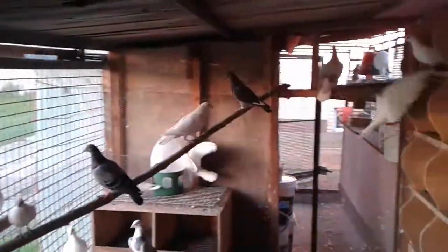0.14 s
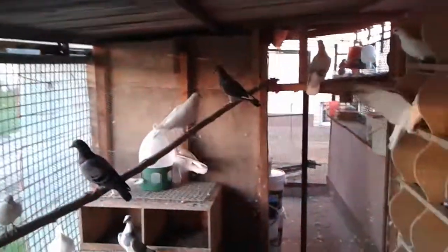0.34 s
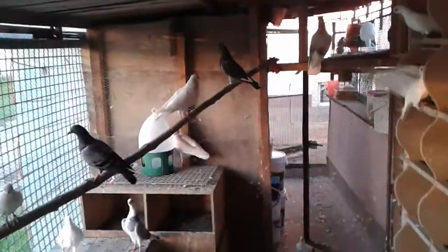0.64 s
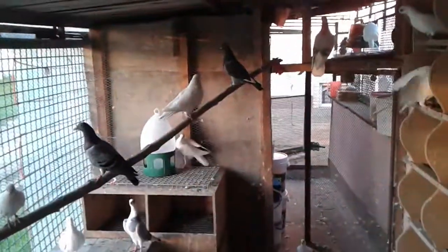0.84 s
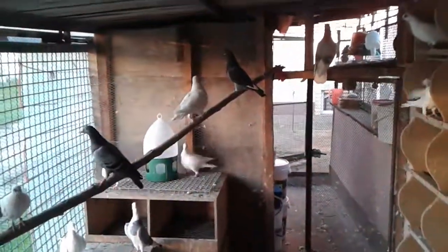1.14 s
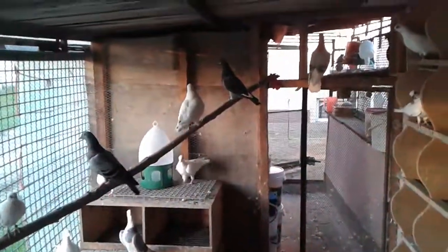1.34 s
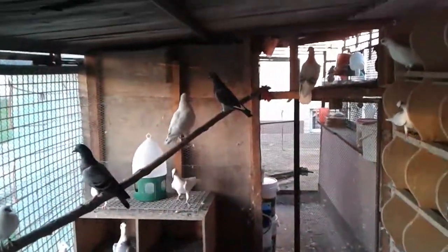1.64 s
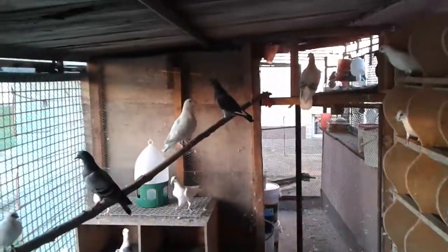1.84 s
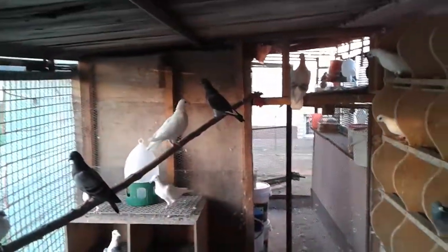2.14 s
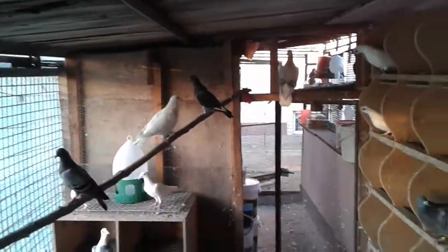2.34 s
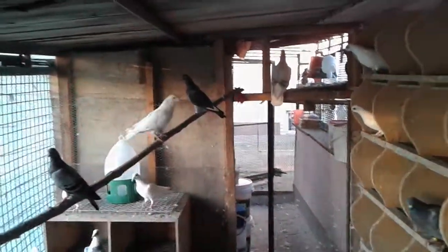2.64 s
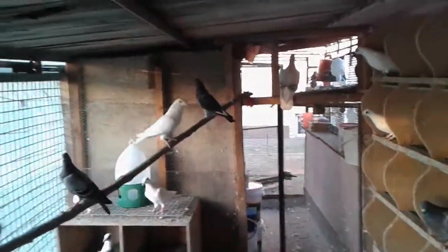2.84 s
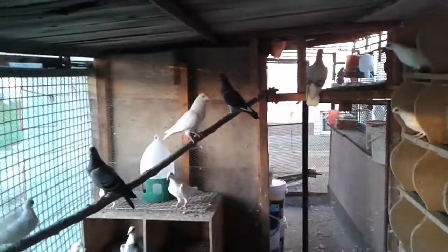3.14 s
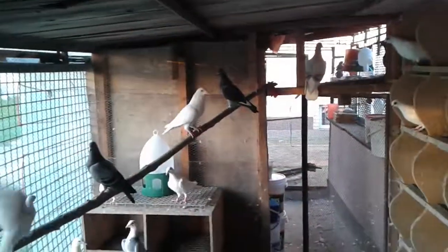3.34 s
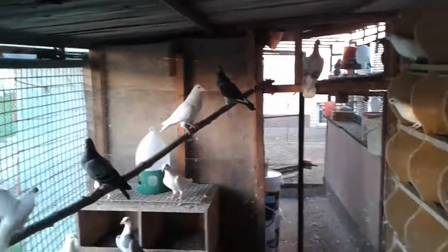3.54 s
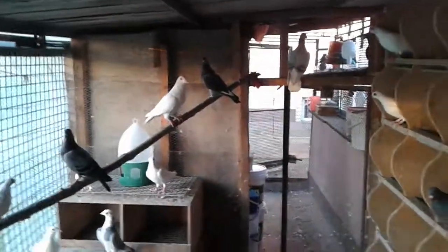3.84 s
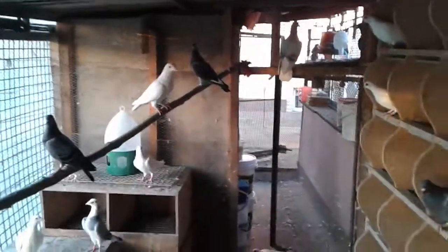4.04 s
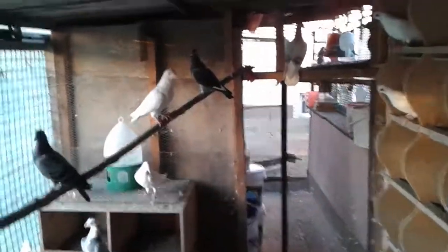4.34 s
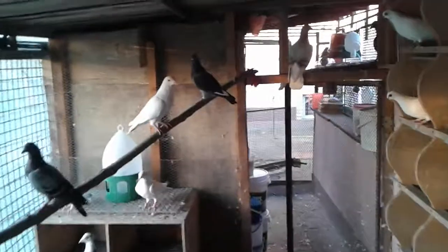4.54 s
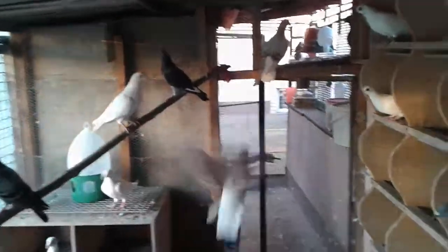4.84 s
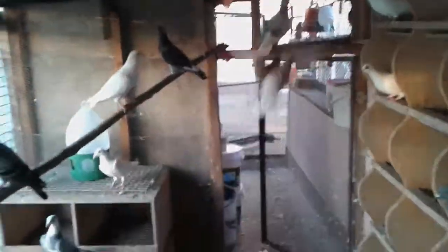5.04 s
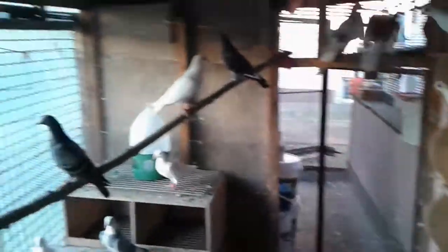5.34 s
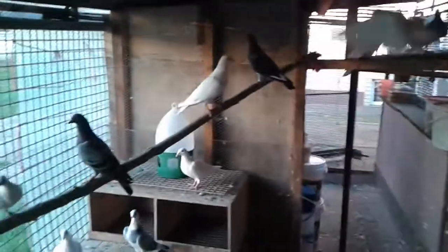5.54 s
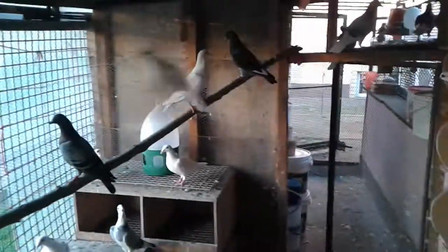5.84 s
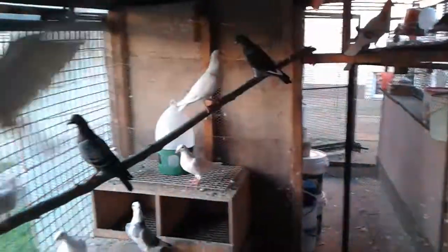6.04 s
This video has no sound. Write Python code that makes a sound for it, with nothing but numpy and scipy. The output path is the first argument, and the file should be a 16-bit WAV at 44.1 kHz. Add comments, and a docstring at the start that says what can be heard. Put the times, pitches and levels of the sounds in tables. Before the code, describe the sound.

Low stuttering pigeon coos with dry scratches and dull thuds, a small hard squeak and snap nearby, then bursts of flapping and scuffling.

```python
"""A wooden pigeon loft: one bird coos a stutter of short notes and then a held note, three times.
The coos are gliding partials; scratches, feather flicks and longer scrapes are bursts of grainy noise.
Low thuds ring at a pitch, a wing bone knocks a nest box, wings and shuffling birds are shaped noise.
Close to the microphone something small and hard squeaks by stick and slip, and snaps as ringing modes.
Short wooden echoes and a faint, uneven low murmur lie behind."""
import sys
import numpy as np
from scipy import signal
from scipy.fft import rfft, irfft
from scipy.io import wavfile
from scipy.ndimage import uniform_filter1d

SR = 44100
rng = np.random.default_rng(int(sys.argv[2]) if len(sys.argv) > 2 else 0)


def put_to_file(sound):
    """Save the sound as 16-bit audio at rate SR, in the file named by the first command-line argument."""
    columns = np.atleast_2d(sound).T  # one column per channel
    safe = np.clip(columns, -1, 1)
    whole_steps = np.round(safe * 32767)
    wavfile.write(sys.argv[1], SR, whole_steps.astype(np.int16))


N = 272097


def gain_of(db):
    """Decibels to amplitude."""
    return 10 ** (np.asarray(db) / 20)


def evened(x):
    """Scales to rms 1."""
    return x / np.sqrt(np.mean(x ** 2) + 1e-20)


def read(points, hz):
    """Reads a table against frequency on a log-frequency axis."""
    f, value = np.transpose(points)
    return np.interp(np.log(hz + 1), np.log(f + 1), value)


def add(mix, s, sound):
    """Mixes a sound in at time s."""
    part = mix[max(round(s * SR), 0):][:len(sound)]
    part += sound[:len(part)]


def play(mix, rows, source):
    """Mixes in one sound of the source for each row of its table."""
    for row in rows:
        add(mix, *source(*row))


def columns(rows):
    """Sample times and every column of a curve table."""
    s, *rest = np.transpose(rows)
    t = np.arange(s[0], s[-1], 1 / SR)
    return t, *(np.interp(t, s, c) for c in rest)


def wander(size, smooth_s):
    """Smooth chance of rms 1."""
    span = max(int(smooth_s * SR), 1)
    return evened(uniform_filter1d(uniform_filter1d(rng.standard_normal(size), span), span))


def grainy(size, hz, octaves, grain_db, skirt):
    """Uneven noise around one pitch, with a weak skirt towards the treble."""
    f = np.fft.rfftfreq(size, 1 / SR) + 1
    colour = np.exp(-.5 * (np.log2(f / hz) / octaves) ** 2) + skirt * f / (f + hz)
    hump = evened(irfft(rfft(rng.standard_normal(size)) * colour))
    return hump * gain_of(grain_db * wander(size, 0.00052))


def noise(spectrum, patchy_db, flicker_db):
    """Coloured noise with drifting patches and a flicker shared by all frequencies."""
    frames, hz_bins = N // 128 + 5, 257
    patches = uniform_filter1d(rng.standard_normal((hz_bins, frames)), 6, axis=0)
    patches = evened(uniform_filter1d(patches, 12, axis=1))
    flicker = evened(uniform_filter1d(rng.standard_normal(frames), 3))
    field = gain_of(patchy_db * patches + flicker_db * flicker)
    white = rfft(rng.standard_normal(N))
    coloured = irfft(white * gain_of(read(spectrum, np.fft.rfftfreq(N, 1 / SR))), N)
    z = signal.stft(coloured, nperseg=512, noverlap=384)[2]
    return evened(signal.istft(z * field[:, :z.shape[1]], nperseg=512, noverlap=384)[1][:N])


# short low notes of the stutter, and at 5.385 and 5.702 s soft wing thumps: t/s, level/dB,
# pitch about a third of the way in f/Hz, octave against the note level/dB, length t/s
SHORT_LOW_NOTES = [(0.261, -42, 290, -7, 0.028), (0.311, -34, 333, -11, 0.018),
                   (0.358, -38, 322, -8, 0.029), (0.422, -36, 301, -9.5, 0.029),
                   (1.24, -39, 285, -11, 0.03), (1.299, -39.5, 324, -4, 0.028),
                   (1.369, -40, 323, -4.5, 0.025), (2.905, -48, 355, -16.5, 0.018),
                   (2.936, -47, 267, -7, 0.034), (2.977, -39, 278, -8, 0.031),
                   (3.024, -35, 319, -13, 0.036), (3.104, -40, 278, -5.5, 0.0246),
                   (3.585, -49.5, 214, -15.5, 0.036), (3.63, -51.5, 201, -18.5, 0.023),
                   (5.385, -45, 318.5, -21, 0.033), (5.702, -31.5, 302.5, -27, 0.032)]
RASP_DB = -23.5  # third and fourth partials


def note(s, db, hz, octave_db, length):
    """A short low note: the pitch sags, the octave swells in the middle as the crop resonates."""
    u = np.arange(0, 1, 1 / (length * SR))
    turn = 2 * np.pi * np.cumsum(hz * (1.08 - 0.23 * u)) / SR
    dip = 1 - .5 * np.exp(-((u - .45) / 0.3) ** 2)
    low = np.sin(np.pi * u ** 0.46) * dip * np.sin(turn)
    octave = gain_of(octave_db) * np.sin(2 * turn + 2.7)
    rasp = gain_of(RASP_DB) * wander(len(u), 0.002607) * (np.sin(4 * turn) + 0.318 * np.sin(3 * turn))
    return s - .003, gain_of(db) * (low + np.sin(np.pi * u) ** 2 * (octave + rasp))


# held notes: start t/s, length t/s, level at the end of the swell/dB, held pitch f/Hz,
# opening pitch f/Hz, late lift f/Hz, octave against the note before the crop level/dB
HELD_NOTES = [(0.316, 0.034, -48.5, 410, 434, 2.5, -12), (0.586, 0.14, -50.5, 242, 363, 7.9, -9),
              (0.753, 0.037, -59, 370, 358, 3, -7), (0.884, 0.06, -57.5, 358, 370, 3, -1),
              (1.537, 0.13, -53.5, 244.6, 341, 17, -7), (1.698, 0.115, -72, 337, 317, 9.8, 8),
              (3.213, .19, -53.5, 276, 374.6, 40, -5)]
DROP_S, SWELL_DB, EDGE_S = 0.0357, 5, .008  # glide to the held pitch, swell to the end, fade at each edge
# the pitch lifts, then sags by a share of itself as the note ends
LIFT_BEFORE_END_S, LIFT_S, LAST_SAG, LAST_SAG_S = 0.035, 0.017, 0.13, 0.0079
CROP_HZ, CROP_OCTAVES = 527, 0.36  # the octave is strongest at the crop resonance


def held(s, length, db, hz, opening_hz, lift_hz, octave_db):
    """A held coo: two clean partials, trembling slightly, the octave shaped by the crop."""
    t = np.arange(0, length, 1 / SR)
    left = length - t
    pitch = hz + (opening_hz - hz) * np.cos(np.pi / 2 * np.minimum(t / DROP_S, 1)) ** 2
    pitch += lift_hz * np.exp(-((left - LIFT_BEFORE_END_S) / LIFT_S) ** 2)
    pitch -= LAST_SAG * hz * np.exp(-left / LAST_SAG_S)
    turn = 2 * np.pi * np.cumsum(pitch * (1 + .008 * wander(len(t), .006))) / SR
    crop = np.exp(-.5 * (np.log2(2 * pitch / CROP_HZ) / CROP_OCTAVES) ** 2)
    tremble = gain_of(1.5 * wander(len(t), .007))
    edges = np.minimum(np.minimum(t, left) / EDGE_S, 1)
    shape = gain_of(db + SWELL_DB * (t / length - 1.0)) * edges
    tone = np.sin(turn) + crop * gain_of(octave_db) * np.sin(2 * turn + 0.795)
    return s, np.sqrt(2) * shape * tremble * tone  # sqrt(2): the level is the rms of the lower partial


# snaps, close to the microphone: release t/s, relative level/dB, rise t/s,
# fall of the crack t/s (both to 1/e), tilt/dB per octave
SNAPS = [(2.345, -29, 0.0017, 0.0019, -8), (2.348, -16.5, 0.001159, 0.001012, -6.5),
         (2.3481, -8, 0.00044, 0.001, 1.5), (2.351, -13.5, 0.00039, 0.0023, -7.5),
         (3.0227, -11, 0.00042, 0.0016, -8), (3.0373, -13.5, 0.0016, 0.0025, -2)]
# modes of the hard thing: f/Hz, level before the tilt/dB, t60/s
HARD_MODES = [(1570.7, -20.5, .008), (2730, -6.5, 0.0085), (4100, -12, 0.0041), (4550, -7, 0.015),
              (5720, 2, 0.019), (6950, -7, 0.0088), (7440, -4.5, 0.017), (9520, -19.5, .005),
              (11600, -15, 0.005)]


def snap(s, db, rise, fall, tilt_db):
    """Strain builds up and lets go: the modes swell with it and ring out, under a thin crack."""
    t = np.arange(4096) / SR - .01  # zero is the release
    swell, after = np.exp(np.minimum(t, 0) / rise), np.maximum(t, 0)
    modes = np.zeros(len(t))
    for hz, level_db, t60 in HARD_MODES:
        level = gain_of(level_db + tilt_db * np.log2(hz / 5000) - 60 * after / t60)
        modes += level * np.cos(2 * np.pi * hz * t + rng.normal(0, 1.0))
    crack = grainy(size=len(t), hz=5900.0, octaves=.6, grain_db=1.0, skirt=.012) * np.exp(-after / fall)
    return s + t[0], .5 * gain_of(db) * swell * (modes + 0.63 * crack)


# squeaks of the hard thing: start t/s, length t/s, opening slip rate f/Hz, climb/Hz per s, level/dB
SQUEAKS = [(2.959, 0.036, 2627, -2500, -40.5), (2.994, 0.027, 2585, 7499.5, -27.5)]
# partials of a squeak: multiple of the slip rate, relative level/dB
SLIP_PARTIALS = [(1, -8), (2, 4), (3, -9.5), (4, -20.5)]


def squeak(s, length, hz, climb, db):
    """Fast, uneven stick and slip that comes in lumps; the second partial is the strongest."""
    t = np.arange(0, length, 1 / SR)
    rate = (hz + climb * t) * (1 + 0.02 * wander(len(t), 0.0012))
    turn = 2 * np.pi * np.cumsum(rate) / SR
    tone = sum(gain_of(level_db) * np.sin(k * turn) for k, level_db in SLIP_PARTIALS)
    uneven = gain_of(3.5 * wander(len(t), 0.0011))
    return s, gain_of(db) * uneven * evened(tone) * np.sin(np.pi * (t / length) ** 0.96) ** 2.3


# scratches and feather flicks: t/s, relative level/dB, centre f/Hz, spread/octaves, t60/s
SCRATCHES = [(.08, -23.5, 5400, .5, 0.035), (.187, -32.5, 2150, 0.61, 0.048),
             (.242, -31, 8040, 0.87, 0.021), (0.369, -40.5, 3960, 0.57, 0.52),
             (0.3955, -33, 5200, 0.56, 0.35), (.4694, -56, 6440, .7, .083),
             (0.521, -42.5, 6500, 0.39, .046), (0.548, -41, 3450, .7, 0.17),
             (0.5651, -33.5, 2820, 0.83, .11), (.6, -39, 3340, 0.99, 0.18),
             (0.7877, -45.5, 4160, 0.63, 0.28), (.821, -37, 3230, 1.17, 0.16),
             (.8992, -50, 2370, 1.172, .16), (1.1866, -33, 3380, 0.36, 0.14),
             (1.2518, -43, 1870, 0.965, 0.087), (1.442, -49.5, 1660, 0.4, 0.095),
             (1.695, -47.5, 1660, 1.172, .13), (1.726, -34, 3170, 0.8, 0.063),
             (1.7747, -45, 5077, .67, 0.034), (1.8153, -49, 3070, 0.23, 0.087),
             (1.8565, -28.5, 4350, 0.46, 0.023), (1.881, -50, 1630, .6, 0.083),
             (1.981, -46, 4000, 0.2, 0.027), (2.139, -51, 5620, .78, 0.23),
             (2.2275, -30.5, 4660, 1.08, .135), (2.317, -59, 5630, 0.55, .057),
             (2.4364, -34, 6400, 0.62, .09), (2.599, -27, 3470, 0.62, 0.043),
             (2.705, -47.5, 6120, 0.651, 0.27), (2.7394, -34.5, 2760, 1.14, 0.058),
             (2.8462, -64.5, 2070, .83, 0.096), (2.916, -46, 2300, 1, 0.061),
             (3.0926, -37, 4397, .8, 0.069), (3.265, -50.5, 2640, 1.1725, 0.13),
             (3.4391, -37.5, 5472, 0.29, 0.046), (3.5703, -44.5, 2690, 1, 0.1),
             (4.1822, -50, 2740, 0.84, 0.13), (4.2015, -51.5, 4900, 0.81, 0.0944),
             (4.2612, -36.5, 3140, 0.49, 0.048), (4.3982, -54, 5250, 0.81, 0.1),
             (4.4578, -47.5, 5926, 0.84, .076), (4.4852, -39, 3160, 0.48, 0.071),
             (4.566, -35.5, 3140, 1, 0.3), (4.7318, -27.5, 6000, .73, .05),
             (4.9521, -37, 5050, 0.34, 0.0615), (4.9703, -19.5, 4460, 0.34, 0.022),
             (5.028, -43, 6120, 0.38, .073), (5.359, -36, 3340, .73, 0.049), (5.373, -38, 4250, .35, .062),
             (5.445, -24.5, 3860, .3, 0.034), (5.4606, -37.5, 3874, 0.25, 0.19),
             (5.506, -33, 4360, 0.74, 0.24), (5.5756, -26, 4061, .64, 0.092),
             (5.6084, -32.5, 3760, 0.19, 0.077), (5.677, -39, 4560, 0.54, 0.0933),
             (5.8232, -46, 4588, 0.4276, .075), (5.9546, -33.5, 6140, 0.34, .05)]
SCRATCH_RISE_S = .0025


def burst(s, db, hz, octaves, t60):
    """A scratch: swells over the rise to a sharp tick, then dies away."""
    t = np.arange(8192) / SR
    after = np.maximum(t - SCRATCH_RISE_S, 0)
    rise = np.minimum(t / SCRATCH_RISE_S, 1) ** 2
    shape = rise * gain_of(-60 * after / t60) * (0.4 + 0.17 * np.exp(-after / 0.0021))
    grains = grainy(size=8192, hz=hz, octaves=octaves, grain_db=2.0, skirt=0.03162)
    return s - .5 * SCRATCH_RISE_S, .5 * gain_of(db) * grains * shape


# steady wing strokes: first t/s, last t/s, rate/strokes per s, relative level/dB
WING_STROKES = [(4.514, 4.93, 17.8, -34), (5.783, 6.03, 17.5, -35.5)]
STROKE_HZ, STROKE_OCTAVES, STROKE_T60, STROKE_SPREAD_DB = 5600, 0.68, 0.023, -2.5


def strokes(first, last, per_s, db):
    """Evenly spaced feather flicks of slightly different strength."""
    return [burst(s, db + STROKE_SPREAD_DB * rng.standard_normal(), STROKE_HZ, STROKE_OCTAVES, STROKE_T60)
            for s in np.arange(first, last, 1 / per_s)]


# longer swelling noises (scrapes, a coo's rasp, a squeak's partials, tails of snaps):
# t/s, length t/s, relative level/dB, centre f/Hz, spread/octaves
SWELLING_SCRAPES = [(0.382, 0.12, -32.5, 5720, 0.18), (0.387, 0.11, -39, 3350, 0.42),
                    (1.109, 0.19, -51, 2496, 0.1384), (1.134, 0.093, -53, 3464, 0.16),
                    (2.025, 0.071, -62, 2394, 0.11), (2.031, 0.0785, -58.5, 3441, 0.0628),
                    (2.028, 0.067, -56.5, 4921, 0.1265), (2.337, 0.07, -32, 4280, 0.79),
                    (2.362, 0.085, -44, 4830, 0.6), (0.298, 0.071, -61, 1210, 0.0918),
                    (2.971, 0.01805, -42, 6368, 0.5), (2.995, 0.023, -35.5, 7400, 0.41),
                    (3.027, 0.088, -43, 4480, 0.85), (3.257, 0.0492, -55, 2730, 0.055),
                    (3.429, 0.031, -48.5, 4270, 0.86), (3.77, 0.11, -70, 3990, 0.96),
                    (3.976, 0.052, -73, 1188, 0.364), (4.155, 0.17, -61, 3440, 0.96),
                    (4.788, 0.12, -36.5, 1420, 0.79), (5.353, 0.082, -43.5, 3400, 0.403),
                    (5.491, 0.06754, -39.5, 4447, 0.12), (5.53, 0.085, -40.5, 4230, 0.569),
                    (5.572, 0.037, -38, 4030, 0.093), (5.824, 0.04, -39, 3950, 0.61)]


def swelling_scrape(s, length, db, hz, octaves):
    """A longer grainy noise that swells and fades."""
    u = np.arange(8192) / (length * SR)
    shape = np.sin(np.pi * np.minimum(u, 1) ** 0.54) ** 3.2
    return s, .5 * gain_of(db) * grainy(size=8192, hz=hz, octaves=octaves, grain_db=-0.5, skirt=.02) * shape


# low thuds and short dull bumps, some perhaps bits of coo:
# t/s, relative level/dB, pitch f/Hz, rattle relative level/dB
LOW_THUDS = [(.184, -38.5, 252, -2), (.569, -44, 730, 0.5), (.789, -44.5, 610, -5),
             (1.189, -35.5, 232, -0.3), (1.214, -38, 183.6, -2.5), (1.694, -50.5, 705, 2.5),
             (1.848, -50, 223, 3.5), (1.878, -41.5, 219, 2), (2.347, -37.5, 215, 1.5),
             (2.357, -39.5, 110, -19), (2.434, -50, 580, 9.5), (2.599, -45.5, 218, 0.5),
             (2.705, -50.5, 596, -4), (2.844, -45, 368, -2.5), (3.048, -38.5, 149, -2.5),
             (3.281, -44, 215, -3.5), (3.446, -33.5, 218, -1.2), (4.478, -44.5, 770, 2.5),
             (4.719, -39.5, 136, 3.5), (4.813, -46, 101, -12), (4.98, -38, 131, 3), (5.365, -44, 693, 3.5),
             (5.446, -37, 311, -13), (5.46, -31, 236, -2), (5.607, -35, 707, 4.5), (5.679, -39.5, 293, 4),
             (5.919, -40.5, 787, -13), (6.058, -46, 98, -8)]
THUD_T60 = 0.098  # seconds, over the tone's own dying


def thud(s, db, hz, rattle_db):
    """A tone rings at its pitch under a short wide rattle; higher tones die sooner."""
    t = np.arange(8192) / SR
    tone = np.sin(2 * np.pi * hz * t * (1 + 0.044 * np.exp(-t / .02))) * np.exp(-t * hz / 18)
    rattle = .5 * gain_of(rattle_db) * grainy(size=8192, hz=580.0, octaves=1.5, grain_db=2.0, skirt=.01)
    return s - .002, gain_of(db - 60 * t / THUD_T60) * np.minimum(t / 0.0036, 1) * (tone + rattle)


# modes of a hollow nest box: f/Hz, relative level/dB, t60/s
BOX_MODES = [(135, -13, .07), (260, -9, .06), (480, -11, .04), (800, -10, .025), (1044, -1, .036),
             (1184, 0, .04), (1378, -7, .04), (4040, 1, .012), (4380, 0, .012), (5300, 1, .01),
             (5900, -1, .01)]


def ring(modes):
    """Answer of a set of modes to one tap."""
    t = np.arange(4000) / SR
    return sum(gain_of(db - 60 * t / t60) * np.sin(2 * np.pi * hz * t) for hz, db, t60 in modes)


# a wing bone ticks, then knocks the box: t/s, relative level/dB, contact t/s before 3 added samples
BOX_KNOCKS = [(4.9711, -28, .0001), (4.9743, -15.5, .0004), (4.9756, -45, .0001)]


def knock(s, db, contact):
    """A longer contact favours the low modes; the small box gives off no deep bass."""
    push = np.hanning(round(contact * SR) + 3)
    sound = signal.fftconvolve(ring(BOX_MODES), push / push.sum())
    return s, .5 * gain_of(db) * signal.sosfilt(signal.butter(2, 110, "high", fs=SR, output="sos"), sound)


# wing bursts and a scuffling landing, one table each:
# t/s, feather rustle level/dB, air pushed before the beat level/dB
WING_BURSTS = [
    [(0, -49, -54), (.05, -44.5, -56), (.07, -49, -58), (.1, -46.5, -61), (.15, -63, -69), (.19, -60, -60)],
    [(4.435, -73, -78), (4.49, -52, -60.5), (4.66, -49, -53.5), (4.83, -47, -52), (4.9, -51.5, -58),
     (5.04, -48, -61), (5.13, -51.5, -49), (5.18, -50.5, -54), (5.22, -62.5, -66), (5.3, -79, -72)],
    [(5.3, -67, -74.5), (5.38, -56, -55), (5.425, -62.5, -65), (5.48, -55, -48), (5.55, -52.5, -56),
     (5.615, -52, -56), (5.645, -57.5, -61), (5.71, -46, -54), (5.77, -60, -50)],
    [(5.77, -57.5, -65), (5.84, -46.5, -53), (5.88, -54, -50), (5.95, -48.5, -53), (6.0, -60, -55.5),
     (6.06, -52, -72), (6.11, -62, -64), (6.17, -56, -62)],
]
BEATS_PER_S, BEAT_DB = 10, 1.5


def wing_bursts():
    """Rustle and air levels of wings and scuffling; the pushed air comes in lumps at a steady beat."""
    rustle, air = levels = np.zeros((2, N))
    for rows in WING_BURSTS:
        during, *burst_db = columns(rows)
        for level, db in zip(levels, burst_db):
            add(level, during[0], gain_of(db))
    t = np.arange(N) / SR
    return rustle, air * gain_of(BEAT_DB * np.cos(2 * np.pi * BEATS_PER_S * (t - 4.63)))


CRACKLE_PER_S, CRACKLE_DB, CRACKLE_SPREAD_DB = 300, -13, 4.3  # mean rate, smallest tick, spread upwards


def crackle():
    """Sparse dry ticks of many sizes and pitches, as quills snap past each other."""
    size = gain_of(CRACKLE_DB + CRACKLE_SPREAD_DB * np.minimum(rng.exponential(1, N), 4))
    size = size * (rng.random(N) < CRACKLE_PER_S / SR)
    kind, t, out = rng.integers(0, 8, N), np.arange(256) / SR, np.zeros(N)
    for k, hz in enumerate(np.geomspace(1200, 9000, 8)):
        tick = grainy(size=256, hz=hz, octaves=0.31, grain_db=5, skirt=0.0485) * np.exp(-t / 0.00097)
        out += signal.oaconvolve(size * (kind == k), tick)[:N]
    return out


# birds shuffling about: t/s, bodies and far cooing level/dB, feather rustle level/dB
SHUFFLE = [(0.0, -57, -55), (0.16, -56.5, -59.5), (0.62, -62.5, -62), (1.26, -60, -62.5), (1.41, -63, -67),
           (1.73, -60.5, -68.5), (1.88, -70, -65.5), (2.09, -64.5, -68), (2.3, -56, -63),
           (2.43, -83, -73.5), (2.65, -63.5, -68), (2.81, -61, -71), (3.23, -68, -69.5), (3.47, -55, -64.5),
           (3.58, -68.5, -76.5), (3.82, -83, -81.5), (4.21, -81, -86), (4.45, -82, -76.5)]


def shuffle():
    """Levels of the bodies and feathers of shuffling birds, as curves over time."""
    s, *levels_db = np.transpose(SHUFFLE)
    return [gain_of(np.interp(np.arange(N) / SR, s, db)) for db in levels_db]


# spectra of pushed air, bodies, wing flap and feathers: f/Hz, relative level/dB per Hz
AIR_SPECTRUM = [(25, -24), (60, -6), (100, 0.5), (160, -4.5), (300, -28.5), (600, -57.5)]
BODY_SPECTRUM = [(80, -36), (180, 3.5), (320, 3), (700, -1.5), (1000, -14.5), (1600, -24.5), (3000, -47.5)]
FLAP_SPECTRUM = [(80, -36), (180, -3.5), (320, 1.5), (500, -1), (750, 1.5), (1100, -5.5), (1800, -10.5),
                 (3000, -45)]
FEATHER_SPECTRUM = [(180, -27.5), (300, 1.5), (488, -12.5), (767, -6.5), (923, -7.5), (1070, -8),
                    (1500, -9.5), (2320, -10), (6340, -10.5), (15200, -26.5), (16500, -45.5)]
AIR_DB, FLAP_DB = -6.5, -1.5  # shuffled air against the bodies, wing flap against the rustle


def stir():
    """Air, bodies and feathers of the flock: a low shuffle, with louder wing bursts and scuffling on top."""
    bodies, feathers = shuffle()
    rustle, air = wing_bursts()
    crisp = gain_of(1.0 * wander(N, 0.0053))  # barbs slip past each other unevenly
    pushed = np.hypot(gain_of(AIR_DB) * bodies, air) * noise(AIR_SPECTRUM, patchy_db=1.0, flicker_db=-1.0)
    moving = bodies * noise(BODY_SPECTRUM, patchy_db=2., flicker_db=1.5)
    flap = gain_of(FLAP_DB) * rustle * noise(FLAP_SPECTRUM, patchy_db=3.5, flicker_db=1.5)
    quills = rustle * crackle()
    barbs = np.hypot(feathers, rustle) * crisp * noise(FEATHER_SPECTRUM, patchy_db=3.0, flicker_db=1.5)
    return pushed + moving + flap + quills + barbs


# dying of the echoes in the loft: f/Hz, t60/s
LOFT_DECAY = [(100, 0.14), (500, 0.16), (3000, 0.087), (12000, 0.048)]


def loft(x):
    """Sparse taps of random sign, each band dying at its own speed."""
    taps = np.zeros(SR // 2)
    at = np.arange(200, len(taps) - 20, 20)
    taps[at + rng.integers(0, 20, len(at))] = rng.choice([-1., 1.], len(at))
    hz, t, z = signal.stft(taps, SR, nperseg=256)
    tail = signal.istft(z * gain_of(-60 * t / read(LOFT_DECAY, hz)[:, None]), SR, nperseg=256)[1]
    return signal.fftconvolve(x, tail / np.linalg.norm(tail))[:N]


# spectrum of the murmur: f/Hz, relative level/dB per Hz
MURMUR_SPECTRUM = [(15, -40), (25, -5), (32, -10.5), (65, 1.5), (202, -3.5), (368, -14.5), (726, -4),
                   (1180, -10.5), (1930, -25.5), (6550, -25), (16500, -21.5)]


def faint_murmur():
    """Faint, uneven low murmur with a little hiss, at -75 dB rms."""
    return gain_of(-75) * noise(MURMUR_SPECTRUM, patchy_db=6.0, flicker_db=2.0)


def scene():
    """Coos, scratches, thuds and snaps in the loft, over the stir and a faint murmur."""
    coos, claws, near = np.zeros((3, N))  # claws: also flicks, scrapes, thuds and knocks
    play(coos, SHORT_LOW_NOTES, note)
    play(coos, HELD_NOTES, held)
    play(near, SNAPS, snap)
    play(near, SQUEAKS, squeak)
    play(claws, SCRATCHES, burst)
    for row in WING_STROKES:
        for flick in strokes(*row):
            add(claws, *flick)
    play(claws, SWELLING_SCRAPES, swelling_scrape)
    play(claws, LOW_THUDS, thud)
    play(claws, BOX_KNOCKS, knock)
    echoes = loft(gain_of(-14.0) * coos + gain_of(-11.5) * claws + gain_of(-10) * near)
    return (coos + claws + near + echoes + stir() + faint_murmur())[None]


EDGE_HZ = 16150


def record(dry):
    """The microphone loses the deep bass; then the band limit of the recorder."""
    thin = signal.sosfilt(signal.butter(2, 45, "high", fs=SR, output="sos"), dry)
    return signal.oaconvolve(thin, signal.firwin(511, EDGE_HZ, window=("kaiser", 9), fs=SR)[None], "same")


dry = scene()
out = record(dry)
put_to_file(out)
```